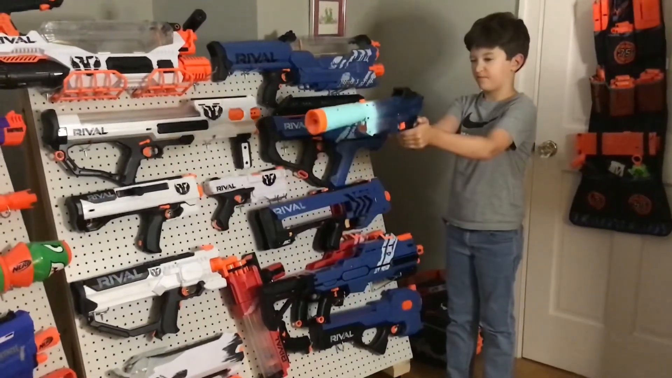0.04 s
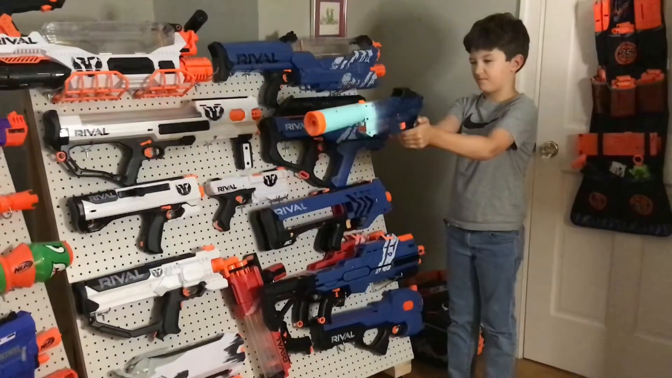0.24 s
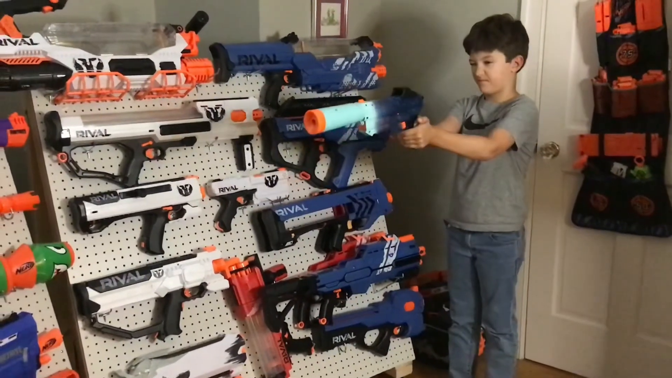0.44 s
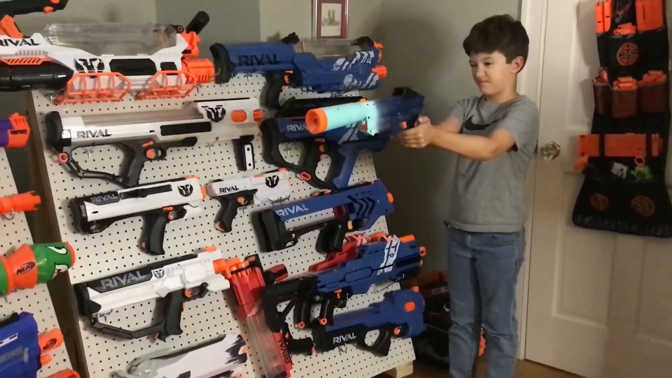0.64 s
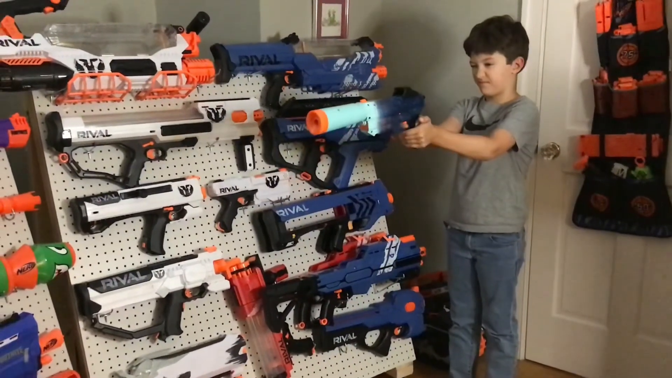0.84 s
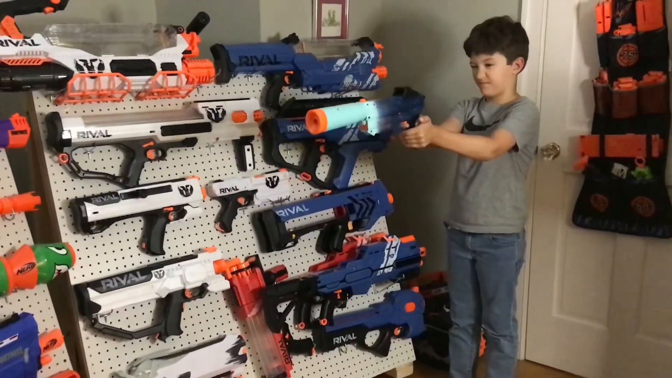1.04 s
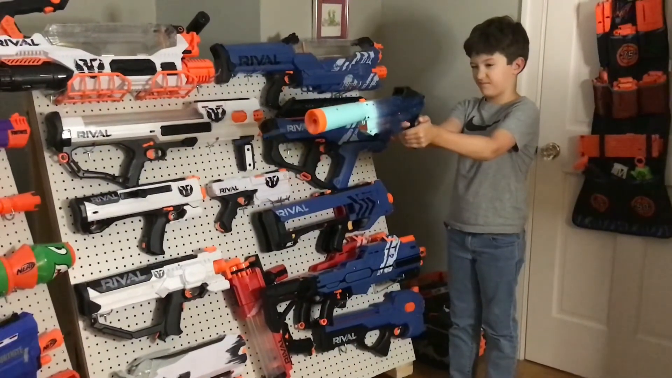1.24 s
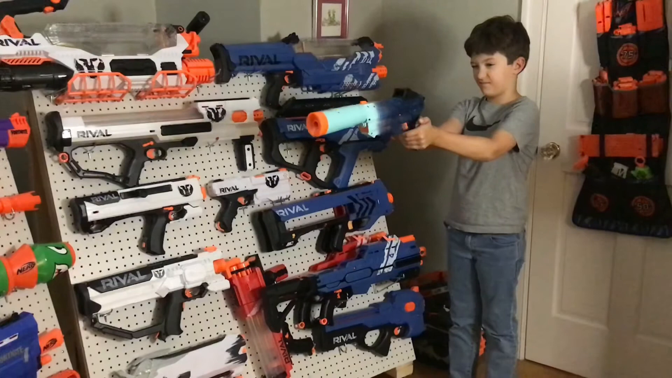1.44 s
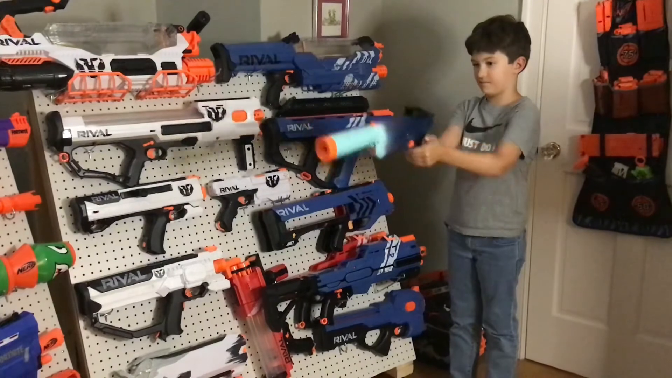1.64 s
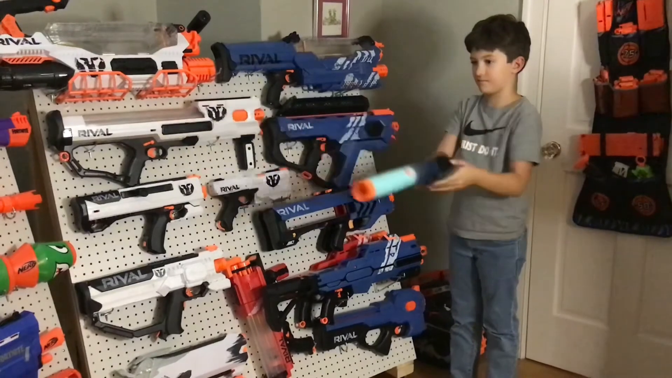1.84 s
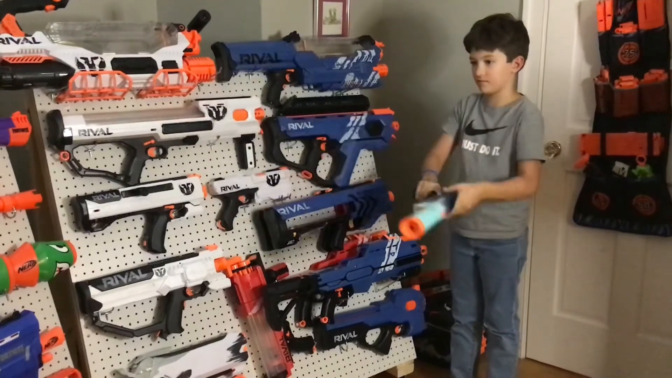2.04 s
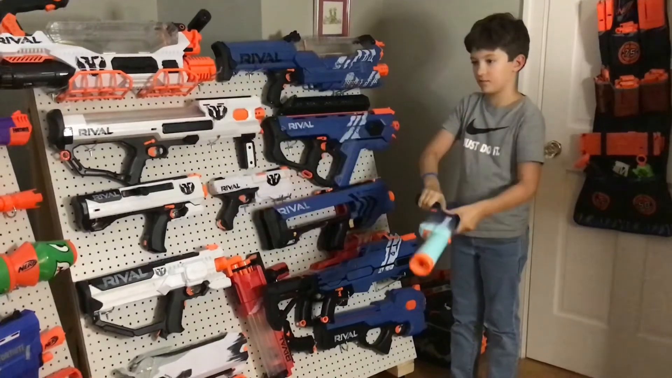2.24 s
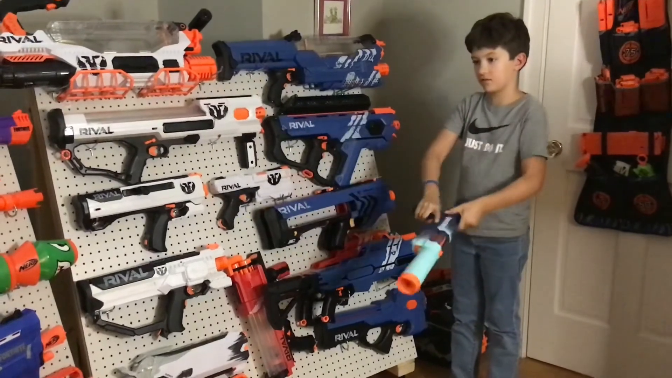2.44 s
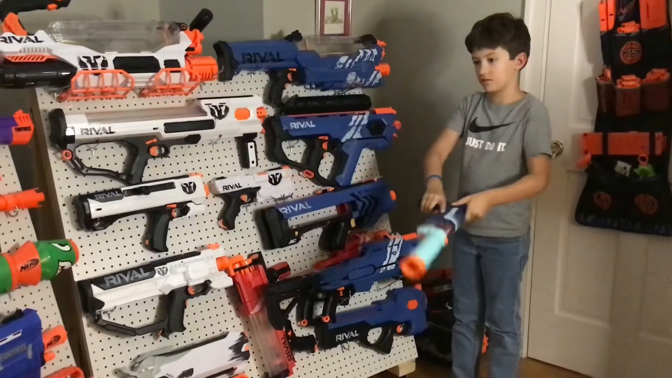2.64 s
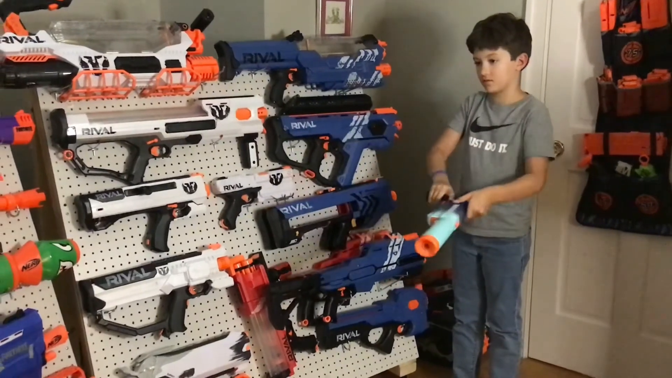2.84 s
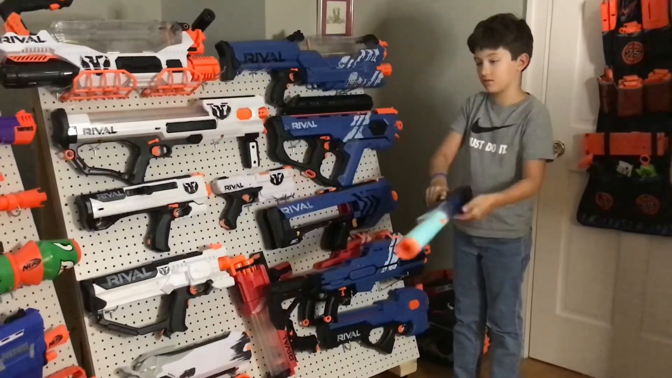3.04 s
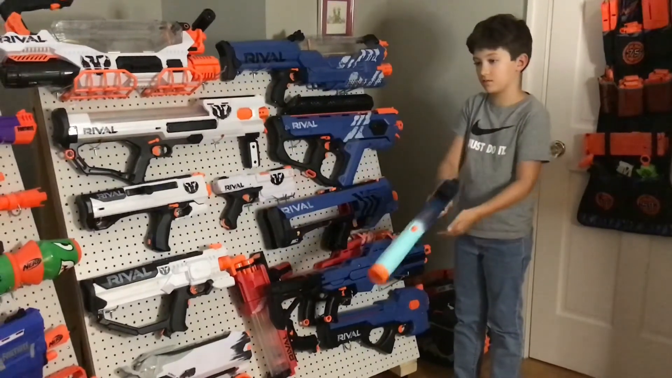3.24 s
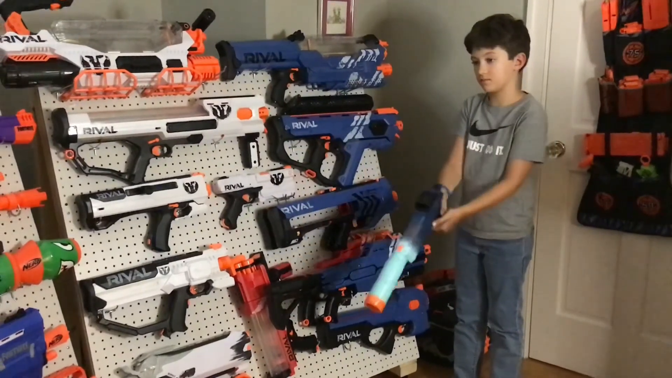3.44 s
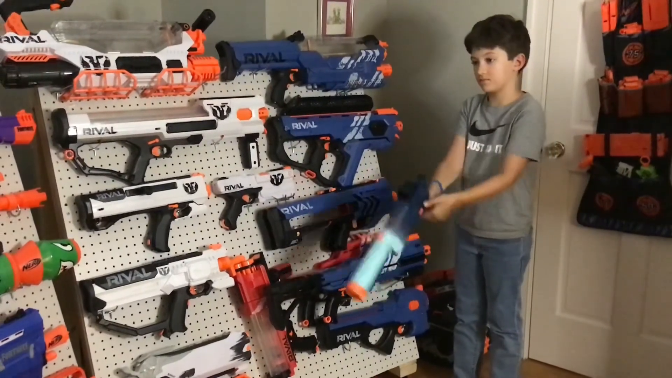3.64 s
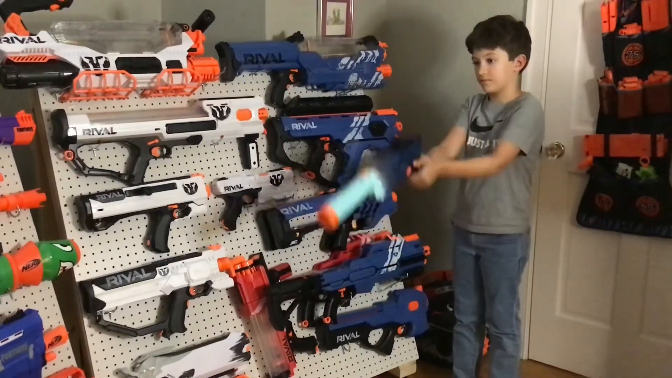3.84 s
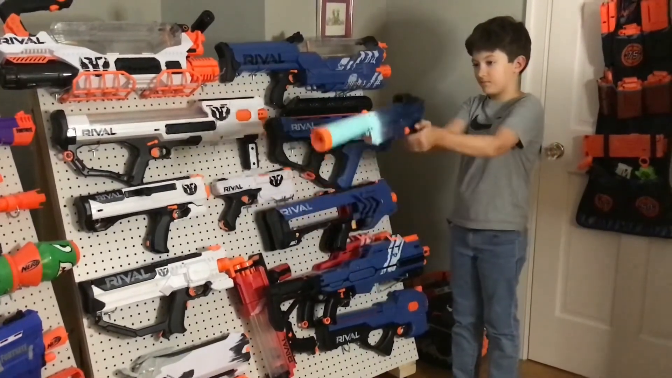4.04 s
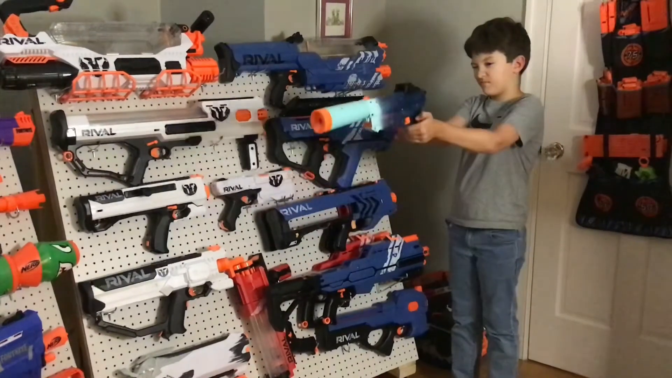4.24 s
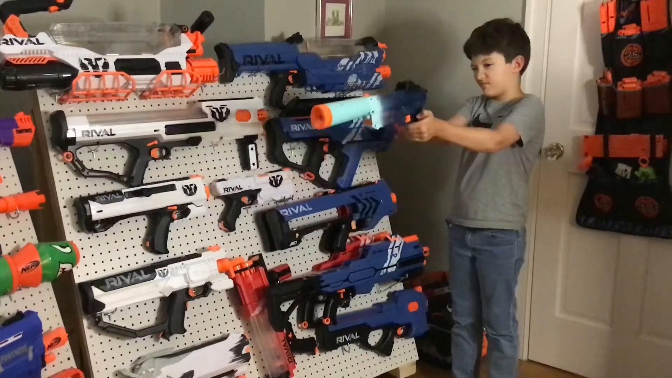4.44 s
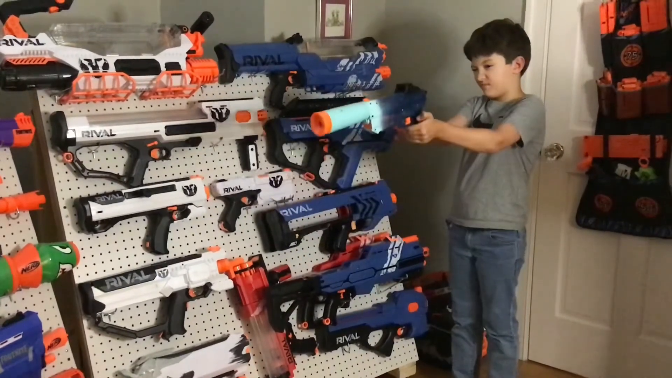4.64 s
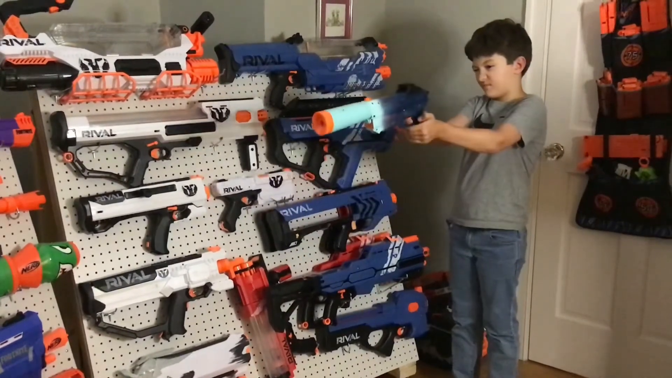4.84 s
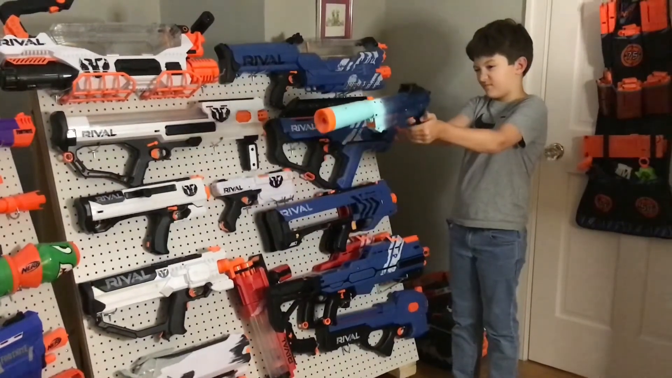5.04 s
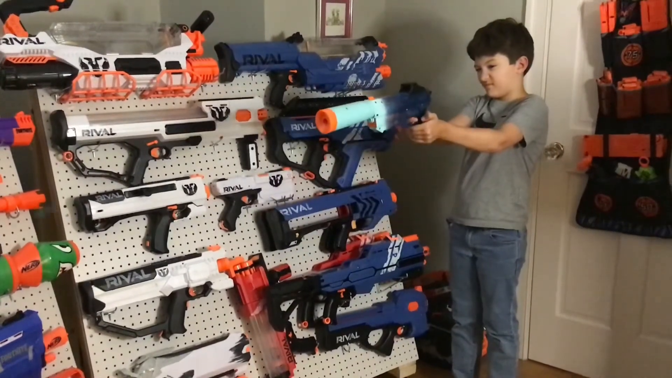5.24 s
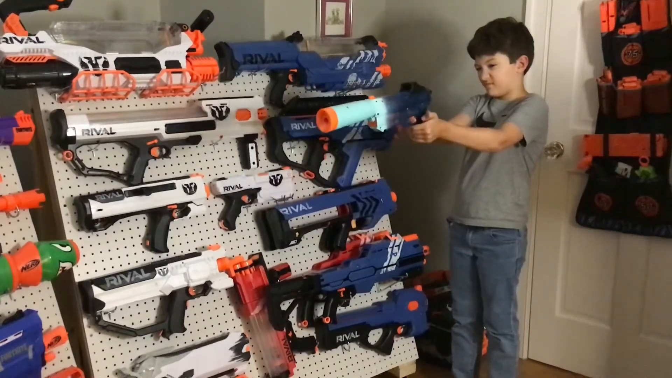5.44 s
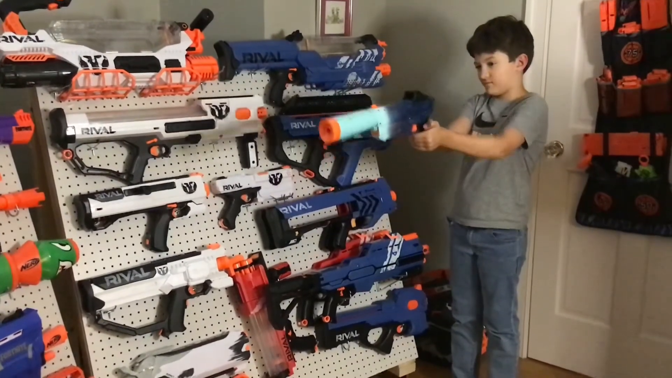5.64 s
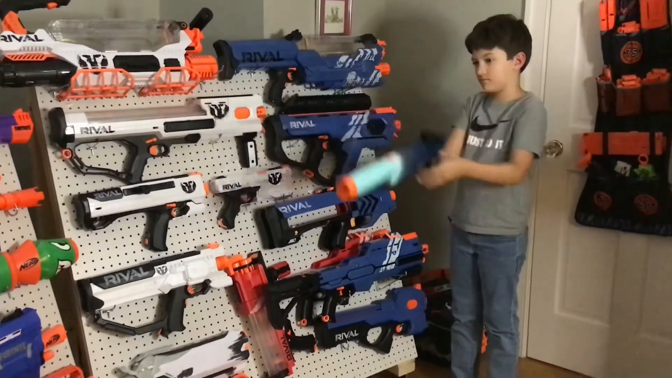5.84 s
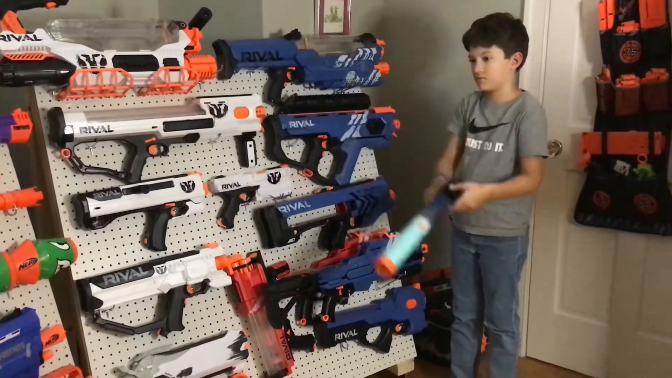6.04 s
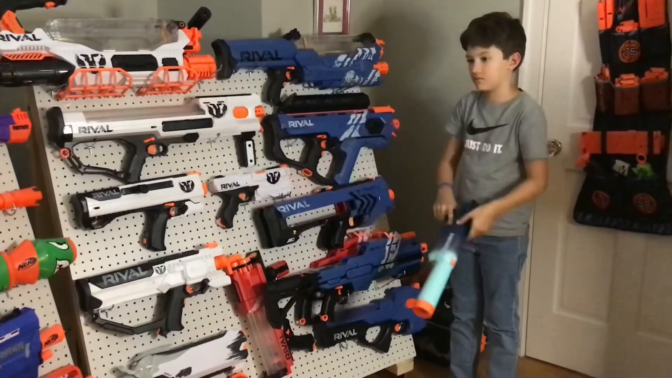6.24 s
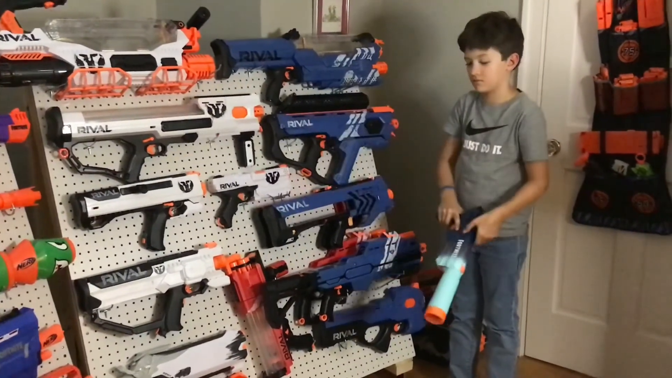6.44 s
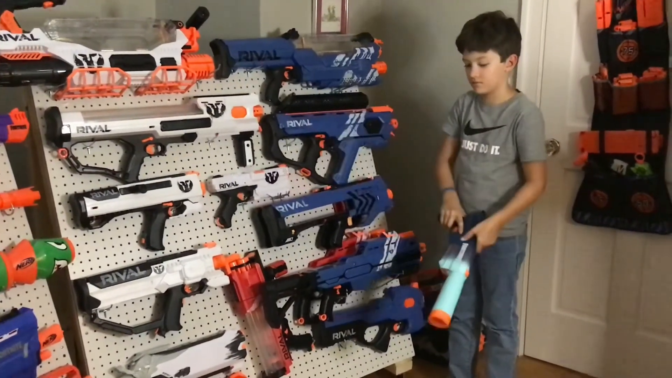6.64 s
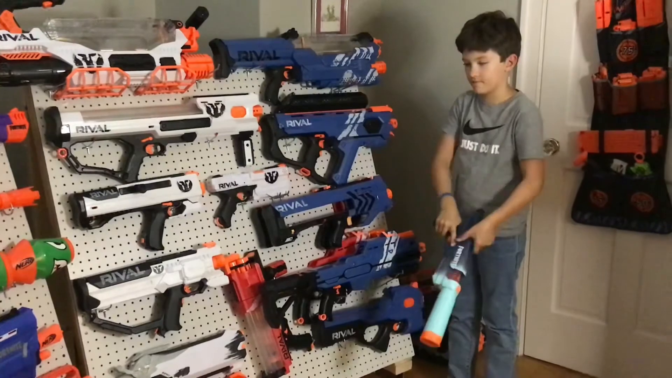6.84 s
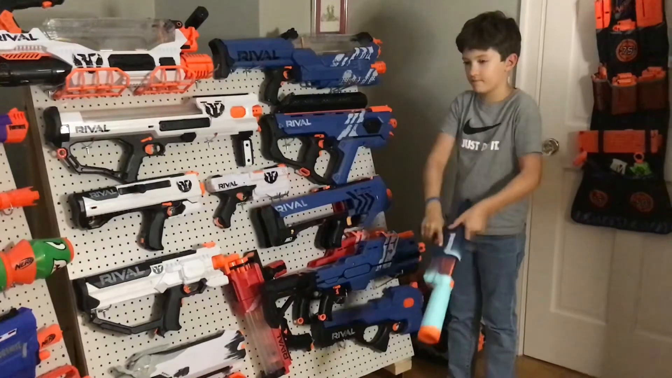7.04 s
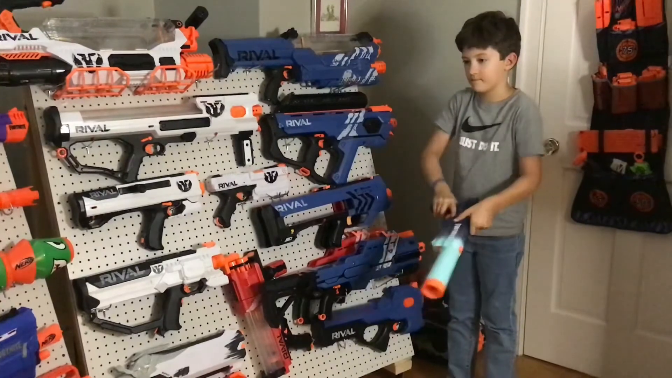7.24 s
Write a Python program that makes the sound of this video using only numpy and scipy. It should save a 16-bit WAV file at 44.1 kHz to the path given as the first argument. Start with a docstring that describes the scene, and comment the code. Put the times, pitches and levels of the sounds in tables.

```python
"""Plastic blaster in a lively room

A small room, one microphone: a few steps away a spring-powered plastic blaster is fired twice.
After each shot its slide is racked back and slammed home; the second foam ball smacks a panel close by.
Between the shots a loose ball bounces and rolls, and the shell ticks in the hands, over faint hum and hiss.
Blows are bursts of noise or clicks, coloured and given a room tail; the pop, boom and hum are sines."""
import sys
import numpy as np
from scipy import signal
from scipy.fft import rfft, irfft
from scipy.io import wavfile
from scipy.ndimage import map_coordinates

SR = 44100
rng = np.random.default_rng(int(sys.argv[2]) if len(sys.argv) > 2 else 0)


def digitize_waveform(pressure):
    """Quantize a signal to 16-bit integers and store it at the path in sys.argv[1].

    Rows of a 2-D input are taken as channels; values are limited to [-1, 1].
    """
    field = np.atleast_2d(pressure).T
    bounded = np.clip(field, -1, 1)
    quanta = np.round(bounded * 32767).astype(np.int16)
    wavfile.write(sys.argv[1], SR, quanta)


N = 321930  # samples in the scene
SIZE = 32768  # samples in one blow with its room tail
T = np.arange(SIZE) / SR  # time within a blow, s
HZ = np.fft.rfftfreq(SIZE, 1 / SR)


# Trigger pulls: t/s, catch click level/dB, plunger slam level/dB, air pop level/dB
SHOTS = [(1.1853, -29.5, -17, -22.5), (5.1425, -28.5, -17.5, -20)]
# Colour of the plunger meeting its stop: f/Hz, level/dB
PLUNGER_COLOUR = [(40, -38.5), (130, -16), (250, -5), (400, -10), (520, 1), (900, -2), (1500, -11),
                  (2500, -12.5), (5000, -14.5), (10000, -22), (16000, -35)]
# Colour of the pop's tail in the room: f/Hz, level/dB
POP_COLOUR = [(30, -40), (70, -18.5), (120, -16.5), (190, 0.5), (320, -8.5), (600, -22), (3000, -65)]


def shots(travel_s=.005, pop_delay_s=.009, pop_hz=198, pop_time_s=.0064):
    """The catch lets go, the plunger slams into its stop and the air in the barrel pops for a few cycles."""
    out = np.zeros(N)
    u = T / pop_time_s
    pop = norm(u ** 2 * np.exp(-u) * np.sin(2 * np.pi * pop_hz * T))
    for s, click_db, slam_db, pop_db in SHOTS:
        release = in_room(clatter(time=.002), wet_db=5)
        add(out, s, click_db, coloured(release, along(CATCH_COLOUR)))

        slam = in_room(clatter(time=.0042, grain=.4), wet_db=2)
        slam_colour = along(PLUNGER_COLOUR) + .55 * hollow_db() + ripple(depth_db=1.4)
        add(out, s + travel_s, slam_db, coloured(slam, slam_colour))

        pop_tail = in_room(pop, wet_db=0) - pop  # the room alone
        pop_tail = norm(coloured(pop_tail, along(POP_COLOUR)))
        add(out, s + pop_delay_s, pop_db, pop + amp(-4.5) * pop_tail)
    return out


# Re-cocking, one row a cycle: unlock t/s, catch t/s, back stop t/s, push forward t/s, feed t/s,
# slam home t/s, feed level/dB, body thud level/dB
RACKS = [(2.248, 2.3735, 2.420, 2.550, 2.636, 2.698, -38, -33),
         (6.645, 6.809, 6.866, 7.012, 7.115, 7.176, -30, -37)]
# Stages of a cycle: level/dB, clatter time t/s, weight level/dB, brightness slope/dB per octave
UNLOCK = (-41.5, .0105, 3, -1.4)
SCRAPE = (-31.3, .0105, -9, .5)
BACK_STOP = (-26.5, .0044, -7, -.6)
PUSH = (-42.5, .0045, -8, -3)
HOME = (-18.8, .0032, 3.5, -.1)
# The spring's catch engages: level/dB, ring f/Hz, ring width f/Hz, ring level/dB
LATCH = (-30, 3080, 1400, 10.5)
SCRAPE_LEAD_S = .019  # the slide scrapes just before it meets either end
THUD_LAG_S, THUD_HZ = .016, 240  # the whole body follows the slam


def racking():
    """The slide unlocks, latches the spring and hits its back stop; pushed forward, it feeds and slams home."""
    sounds = []
    for unlock, latch, back, push, feed, home, feed_db, thud_db in RACKS:
        sounds += [
            clack(unlock, *UNLOCK),
            snap(latch, *LATCH),
            clack(back - SCRAPE_LEAD_S, *SCRAPE),
            clack(back, *BACK_STOP),
            clack(push, *PUSH),
            clack(feed, feed_db, time=.009, weight_db=-12, bright_db=-1.7),
            clack(home - SCRAPE_LEAD_S, *SCRAPE),
            clack(home, *HOME),
            bump(home + THUD_LAG_S, thud_db, THUD_HZ),
        ]
    return played(sounds)


# The slide running on its rails: level/dB, unevenness level/dB
RUB = (-54.5, 3)
# Colour of that friction: f/Hz, level/dB
RAILS_COLOUR = [(100, -22), (550, 0), (1100, -7), (3000, -12), (15000, -34)]


def rubbing(fade_s=.035):
    """Uneven friction noise of the slide, from the grip that unlocks it until it is home."""
    t = np.arange(N) / SR
    db, uneven_db = RUB
    moving = np.zeros(N)
    for unlock, _, _, _, _, home, _, _ in RACKS:
        to_edge = np.minimum(t - unlock + fade_s / 2, home - t)
        moving += np.clip(to_edge / fade_s, 0, 1) ** 2
    return moving * amp(db + uneven_db * wobble(rate=90)) * noise(RAILS_COLOUR)


# The shell knocks in the hands: t/s, level/dB, clatter time t/s, weight level/dB, brightness slope/dB per octave
TICKS = [(1.134, -58, .03, 7, -4.5), (1.446, -56.5, .007, -6, -3), (1.893, -62.5, .003, 5.5, -4),
         (2.138, -60, .009, -2.5, -.5), (3.064, -66, .004, 2.5, -1), (3.243, -59, .003, -3, -6),
         (4.104, -52, .004, 4, -7.5), (5.114, -56.5, .003, -1.5, -6), (5.753, -53.5, .0015, 12.5, -4),
         (5.968, -55, .001, 18, -5), (6.111, -57.5, .0018, 8, -2.5), (6.135, -54, .005, 17, -1),
         (6.156, -61, .001, 5, -.5), (6.252, -56, .0032, 11.5, -3), (6.598, -61, .004, 2, -2.5)]
# Small clicks and taps, some ringing: t/s, level/dB, ring f/Hz, ring width f/Hz, ring level/dB
SNAPS = [(2.3453, -40.5, 2700, 1700, 13), (3.244, -62.5, 1700, 1300, 23), (4.716, -60, 1900, 2300, 8),
         (5.652, -67, 2197, 399, 14), (5.968, -65.5, 7000, 7000, 22), (6.254, -64.5, 5070, 2500, 24),
         (6.398, -66, 3960, 2170, 22), (6.4265, -54.5, 4050, 500, 17), (6.758, -48.5, 2050, 330, 17)]


def handling():
    """The shell knocks in the hands, with small clicks and taps, some ringing."""
    return played([clack(*row) for row in TICKS] + [snap(*row) for row in SNAPS])


CREAKS_PER_S, CREAK_DB, CREAK_SPREAD_DB = 3, -69.5, 2  # spread either way


def creaks():
    """Very faint ticks of the shell, scattered at random."""
    draws = rng.random((int(CREAKS_PER_S * N / SR), 2))
    sounds = []
    for when, size in draws:
        db = CREAK_DB + CREAK_SPREAD_DB * (2 * size - 1)
        sounds.append(clack(when * N / SR, db, time=.007, weight_db=1, bright_db=-4))
    return played(sounds)


# The ball on the panel: t/s, level/dB
SMACK = (5.3115, -8)
# Modes of the panel, relative to each other: f/Hz, level/dB, t60/s
PANEL = [(73, -13.5, 0.62), (227, 4.5, 0.37), (358, -5, .25), (464, -3, 0.24), (577, -5, 0.22),
         (631, -4.5, 0.19), (856, 1, 0.16), (921, -11, 0.27), (1006, -11.5, 0.18), (1068, -6, 0.25),
         (1141, -8, 0.2), (1336, -12, 0.3), (1377, -26, 0.38)]
# Colour of the slap: f/Hz, level/dB
SLAP_COLOUR = [(40, -32), (130, -15), (230, 2), (450, 3.5), (850, -3.5), (1300, -9), (2000, -24.5),
               (2600, -14.5), (3400, -15), (5000, -27), (10000, -29), (16000, -44)]


def smack():
    """The ball hits a panel near the microphone: a hard slap and crack, then the board's modes boom."""
    out = np.zeros(N)
    s, db = SMACK
    slap = norm(coloured(in_room(click(), wet_db=13.5, build=.005), along(SLAP_COLOUR)))
    crack_colour = 22 * peak(1200, 910) + 24 * peak(2900, 2400)
    crack = norm(coloured(clatter(time=.0005, grain=.1), crack_colour))
    boom = np.zeros(SIZE)
    for hz, level, t60 in PANEL:
        boom += amp(level - 60 * T / t60) * np.sin(2 * np.pi * (hz * T + rng.random()))
    boom = norm(boom * (1 - np.exp(-T / .004)))  # the board takes a moment to swing
    add(out, s, db, slap + amp(-3.5) * boom + amp(-11.5) * crack)
    return out


# A loose ball lands on the floor: t/s, level/dB, pitch f/Hz
DROP = (2.578, -36, 275)
FLIGHT_S, FLIGHT_SHRINK, BOUNCE_LOSS_DB = .175, .66, 3  # first flight, each next over the last, loss a bounce


def bouncing(count=8):
    """The ball bounces ever faster and more softly, each flight a fixed share of the last."""
    s, db, hz = DROP
    k = np.arange(count)
    flights = FLIGHT_S * FLIGHT_SHRINK ** k
    landings = s + np.cumsum(flights) - flights
    levels = db - BOUNCE_LOSS_DB * k
    return played(bump(at, level, hz) for at, level in zip(landings, levels))


ROLL_START_S, ROLL_END_S = 3.0, 5.1
ROLL_HZ, ROLL_WANDER_OCTAVES, ROLL_TURNS_PER_S = 265, .6, 14


def rolling(db=-69, knots=140, fresh_db=16, settle_s=.13):
    """A faint narrow rumble of wandering pitch as the ball rolls over the floor, loudest early on."""
    t = np.arange(N) / SR
    hz = ROLL_HZ * 2 ** (ROLL_WANDER_OCTAVES * np.tanh(wobble(ROLL_TURNS_PER_S)))
    phase = 2 * np.pi * np.cumsum(hz) / SR
    moving = np.clip(np.minimum(t - ROLL_START_S, ROLL_END_S - t) * 20, 0, 1)  # 50 ms fades
    level_db = db + fresh_db * np.exp(-np.abs(t - ROLL_START_S) / settle_s)
    rumble = wobble(knots) * np.cos(phase) + wobble(knots) * np.sin(phase)
    return amp(level_db) * moving * rumble


# Dull bumps of a ball or a hand: t/s, level/dB, pitch f/Hz
BUMPS = [(1.349, -42.5, 270), (1.367, -52, 89.5), (1.386, -45, 379), (4.145, -51.5, 299.5),
         (5.764, -49, 254)]


def bumps():
    """Single dull contacts, each a soft low push."""
    return played(bump(*row) for row in BUMPS)


# Colour of the room hiss: f/Hz, level/dB
HISS_COLOUR = [(15, -62), (25, -36.5), (43, -11), (119, 1), (169, -20.5), (246, -9), (267, -17.5),
               (457, -17), (495, -13.5), (684, -17.5), (1200, -25.5), (9300, -32), (15500, -38)]
# Mains hum before a 1 dB cut: f/Hz, level/dB
HUM = [(118.4, -79), (242.2, -83), (678.3, -88.5)]
# Clothes and feet, around which the level wavers: t/s, level/dB
SHUFFLE = [(0, -77), (1, -73), (3.3, -73), (5.9, -71), (6.3, -63), (6.6, -67), (7.3, -74)]
# Colour of the shuffle: f/Hz, level/dB
SHUFFLE_COLOUR = [(60, -31), (160, 3.5), (400, -3), (700, -14.5), (1100, -26.5), (8000, -47.5)]


def background():
    """Room hiss, mains hum as steady sines, and the low, uneven noise of someone moving."""
    t = np.arange(N) / SR
    hum = sum(amp(db) * np.sqrt(2) * np.sin(2 * np.pi * hz * t) for hz, db in HUM)
    effort_db = np.interp(t, *np.transpose(SHUFFLE)) + 5 * np.tanh(wobble(rate=12))
    shuffle = amp(effort_db) * noise(SHUFFLE_COLOUR)
    return amp(-69) * noise(HISS_COLOUR) + amp(-1) * hum + shuffle


# Colour of the plastic shell: f/Hz, level/dB
SHELL_COLOUR = [(29, -69), (50, -42), (299, -13), (337, -18.5), (408, -6), (584, -0.5), (1140, -8.5),
                (1380, -7), (1880, -9.5), (3340, -9.5), (3580, -10), (10200, -18), (15000, -27)]


def clack(s, db, time, weight_db, bright_db, weight_hz=290, weight_width=280):
    """Plastic parts meet in a short clatter; weight sets its low body, brightness its tilt. Gives (s, dB, sound)."""
    body = along(SHELL_COLOUR) + hollow_db() + ripple(depth_db=1.9)
    octaves = np.log2(np.clip(HZ, 450, 9000))
    blow = in_room(clatter(time, grain=.49), wet_db=2.5)
    colour = body + weight_db * peak(weight_hz, weight_width) + bright_db * octaves
    return s, db, coloured(blow, colour)


# Colour of the catch and of other small clicks and taps: f/Hz, level/dB
CATCH_COLOUR = [(100, -29), (500, -1), (1400, 3.5), (6000, -4.5), (16000, -11)]


def snap(s, db, hz, width, ring_db):
    """One very short contact, with one band of its spectrum raised. Gives (s, dB, sound)."""
    contact = in_room(clatter(time=.0006, grain=.3), wet_db=7)
    return s, db, coloured(contact, along(CATCH_COLOUR) + ring_db * peak(hz, width))


def bump(s, db, hz, above_db=15, below_db=26):
    """A soft low push that falls by so many dB an octave either side of its pitch. Gives (s, dB, sound)."""
    away = np.log2((HZ + 1) / hz)
    slope = np.where(away > 0, above_db, below_db)
    fall_db = slope * (np.hypot(away, .5) - .5)  # rounded at the pitch itself
    return s, db, coloured(in_room(click(), wet_db=3.5), -fall_db)


# Hollow resonances of the shell: f/Hz, width f/Hz, level/dB
HOLLOW = [(512.5, 22, 4.5), (694, 40, 0.5), (870, 42, 2.5), (2900, 220, -2)]


def hollow_db():
    """The hollow body's resonances in dB, shared by the clacks and the plunger."""
    return sum(db * peak(hz, width) for hz, width, db in HOLLOW)


def ripple(depth_db):
    """Each blow lands on another part and favours other resonances: a random colour in dB."""
    return depth_db * map_coordinates(rng.standard_normal(size=200), [np.sqrt(HZ)])


def clatter(time, grain=.7):
    """A quick swell, fullest at time (s), of tiny contacts of uneven size."""
    u = T / max(time, 1e-4)
    sizes = np.exp(grain * np.repeat(rng.standard_normal(SIZE // 32), 32))
    return norm(u * np.exp(-u) * sizes * rng.standard_normal(SIZE))


def click():
    """A single impulse at the start of a blow."""
    return 1. * (T == 0)


# Decay of the room: f/Hz, t60/s
ROOM = [(70, .55), (250, .36), (600, .33), (3000, .35), (7000, 0.26), (14000, 0.3)]


def in_room(x, wet_db, build=.0019):
    """The direct sound, then a dense tail that fills as the blow delivers its energy; lows ring longest."""
    hz, t, z = signal.stft(rng.standard_normal(SIZE), SR, nperseg=256)
    decay_db = -60 * t / along(ROOM, hz)[:, None]
    tail = signal.istft(z * amp(decay_db), SR, nperseg=256)[1][:SIZE]
    filled = np.sqrt(np.cumsum(x ** 2)) * (1 - np.exp(-T / build))
    return x + amp(wet_db) * norm(tail * filled)


def amp(db):
    """Decibels to gain."""
    return 10 ** (np.asarray(db) / 20)


def norm(x):
    """Scale to energy 1."""
    return x / np.sqrt(np.sum(x ** 2) + 1e-20)


def along(points, hz=HZ):
    """(Hz, value) points read on a log frequency axis."""
    f, v = np.transpose(points)
    return np.interp(np.log(hz + 1), np.log(f + 1), v)


def peak(hz, width):
    """A resonance's bell, 1 at its centre."""
    return 1 / (1 + ((HZ - hz) / (width / 2)) ** 2)


def coloured(x, db):
    """Causal (minimum-phase) filter with the given gain in dB, made by folding the cepstrum."""
    cepstrum = irfft(np.log(np.maximum(amp(db), 1e-6)))
    cepstrum[1:SIZE // 2] *= 2
    cepstrum[SIZE // 2 + 1:] = 0
    return irfft(rfft(x) * np.exp(rfft(cepstrum)))


def noise(points):
    """Steady noise of rms 1 with the given colour."""
    gain = amp(along(points, np.fft.rfftfreq(N, 1 / SR)))
    return norm(irfft(rfft(rng.standard_normal(N)) * gain, N)) * np.sqrt(N)


def wobble(rate):
    """A smooth random curve with rate knots a second."""
    return map_coordinates(rng.standard_normal(int(N / SR * rate) + 4), [np.arange(N) / SR * rate])


def add(track, s, db, x, hold=.027):
    """Place a sound with the energy of an rms level db held for hold seconds."""
    start = round(s * SR)
    track[start:start + SIZE] += (amp(db) * np.sqrt(hold * SR) * norm(x))[:N - start]


def played(sounds):
    """A track with every (s, dB, sound) in its place."""
    out = np.zeros(N)
    for s, db, x in sounds:
        add(out, s, db, x)
    return out


def scene():
    """All sources at the one microphone."""
    blaster = shots() + racking() + rubbing() + handling() + creaks()
    balls = smack() + bouncing() + rolling()
    return (blaster + balls + bumps() + background())[None]


def record(dry, low_hz=42, top_hz=15850):
    """The microphone chain thins deep bass, rounds off the highest peaks and cuts all above its band limit."""
    thin = signal.sosfilt(signal.butter(2, low_hz, "high", fs=SR, output="sos"), dry)
    held = thin / (1 + (thin / .9) ** 6) ** (1 / 6)  # stays below .9
    band = np.clip((top_hz - np.fft.rfftfreq(N, 1 / SR)) / 400 + .5, 0, 1)  # slope 400 Hz wide
    return irfft(rfft(held) * band, N)


dry = scene()
out = record(dry)
digitize_waveform(out)
```